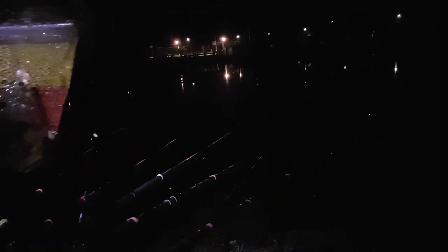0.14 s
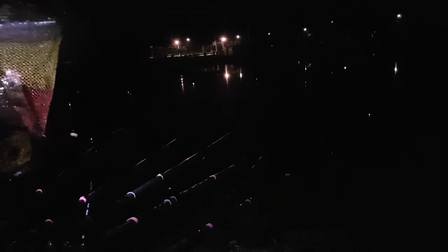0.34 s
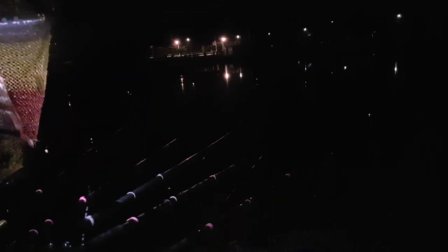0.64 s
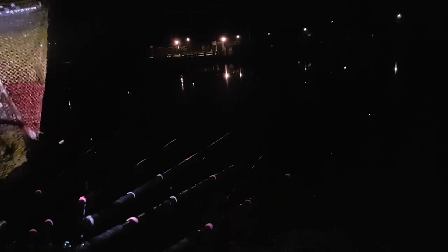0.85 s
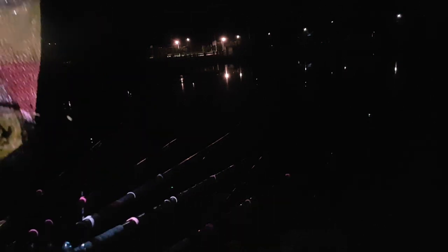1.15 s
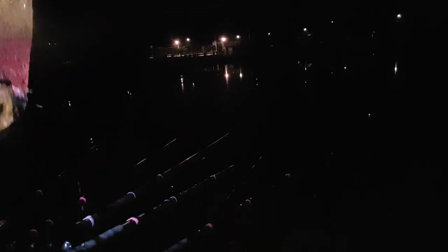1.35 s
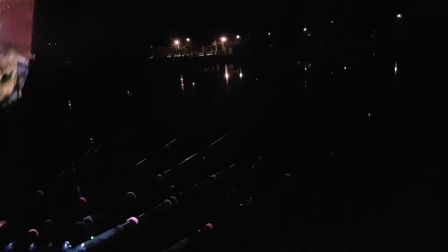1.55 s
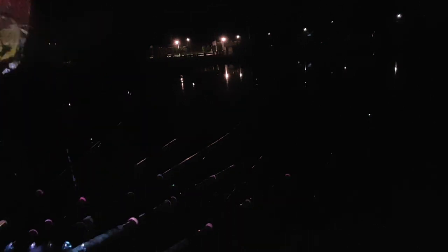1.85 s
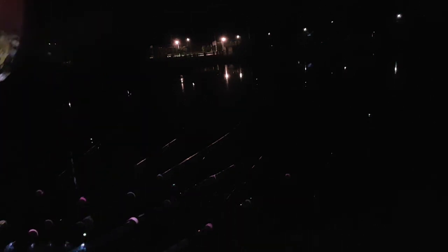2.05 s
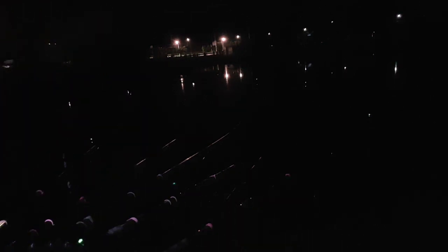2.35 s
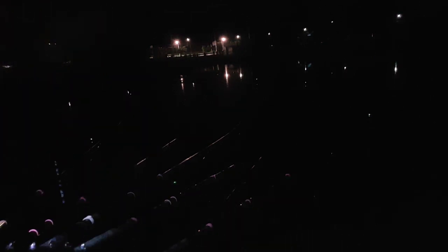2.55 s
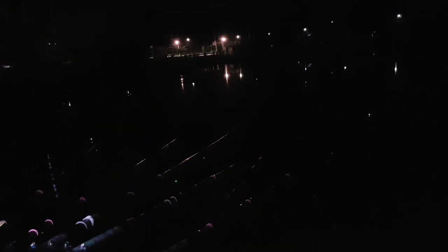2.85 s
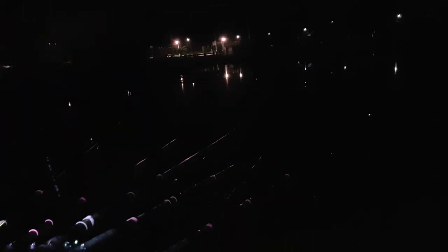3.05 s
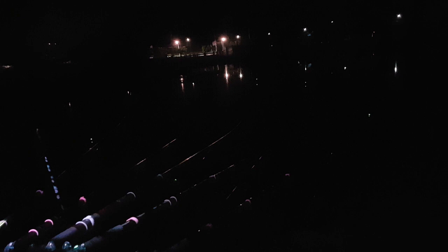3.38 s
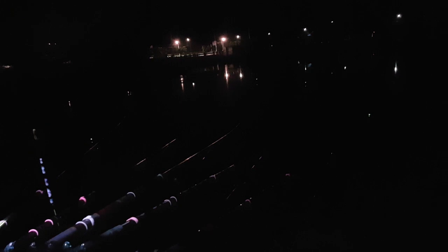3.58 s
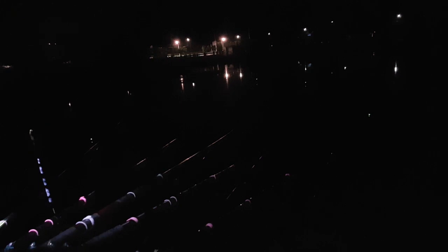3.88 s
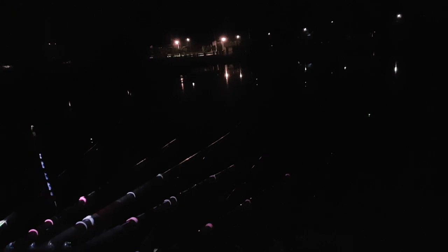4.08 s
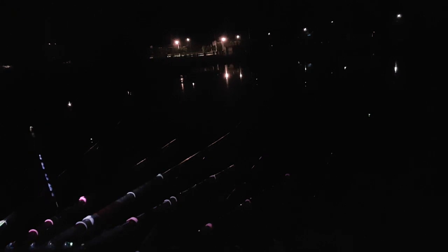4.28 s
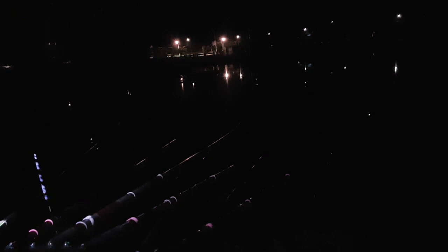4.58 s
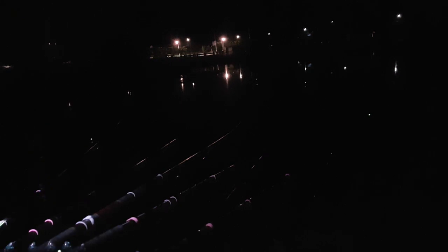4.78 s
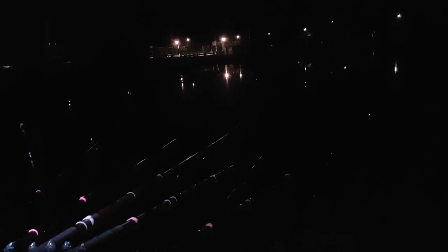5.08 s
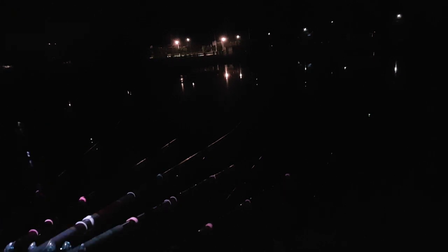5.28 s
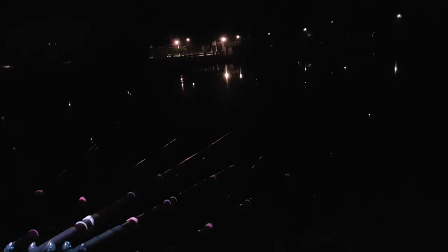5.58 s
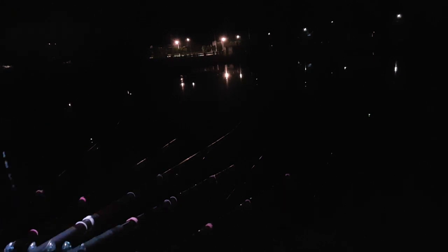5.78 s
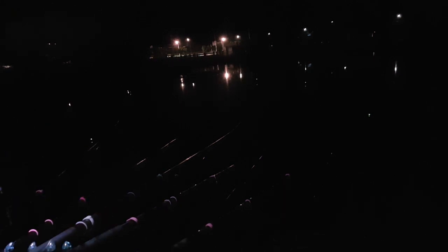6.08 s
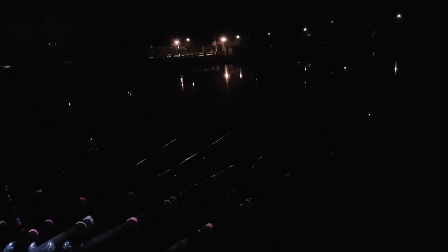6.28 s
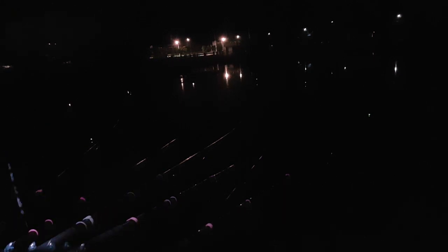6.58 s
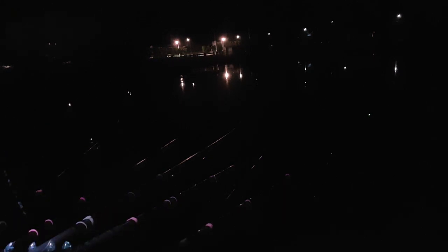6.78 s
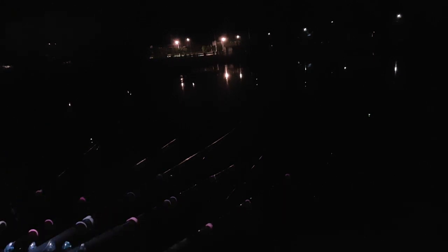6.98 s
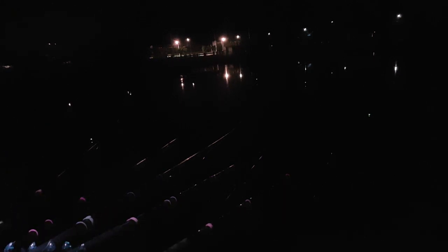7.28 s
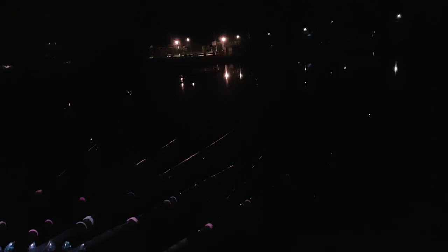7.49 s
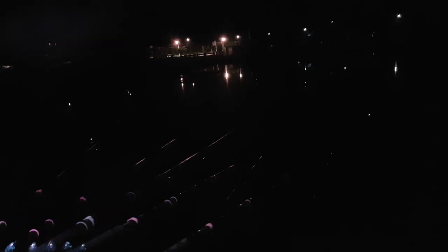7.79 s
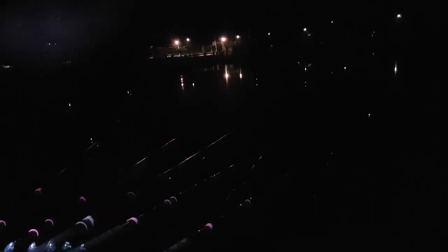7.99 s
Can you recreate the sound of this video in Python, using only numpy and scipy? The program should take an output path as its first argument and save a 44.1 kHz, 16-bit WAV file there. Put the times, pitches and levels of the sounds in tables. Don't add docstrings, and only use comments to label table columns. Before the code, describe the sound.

Regular low, buzzing bullfrog croaks by a dark waterside, a fainter second frog overlapping early ones, with small gurgles, gear clicks and soft rustle.

```python
import sys
import numpy as np
from scipy import signal
from scipy.fft import rfft, irfft
from scipy.io import wavfile
from scipy.ndimage import uniform_filter1d

SR = 44100
rng = np.random.default_rng(int(sys.argv[2]) if len(sys.argv) > 2 else 0)


def waveform_to_disk(signal):
    frames = np.transpose(np.atleast_2d(signal))
    scaled = np.clip(frames, -1, 1) * 32767
    samples = np.round(scaled).astype(np.int16)
    wavfile.write(sys.argv[1], SR, samples)


def volts_from_decibels(level):
    exponent = np.asarray(level, float) / 20
    return 10 ** exponent


N = 358765
TIME = np.arange(N) / SR
HZ = np.maximum(np.arange(N // 2 + 1) * SR / N, 1)

# start_s, length_s, top_pulse_hz, level_db
CROAKS = [
    (-.3, .73, 94.8, -41),
    (.84, 0.77, 97.1, -39),
    (2.13, 0.72, 99.8, -38),
    (3.34, .85, 100.3, -38.5),
    (4.56, .77, 100.4, -39.5),
    (5.87, .74, 99.93, -39.5),
    (7.19, .74, 99.56, -39.5),
]
# attack_s, after_attack, top_share_of_length, before_release, release_s, linger_s, at_rest
# sac, overtones and throat levels in db, pitch in percent
SAC_CONTOUR = (0.1, -7.5, 0.64, -0.5, 0.14, 0.04, -27)
OVERTONE_CONTOUR = (0.12, -8.5, 0.57, -2, 0.13, 0, -19)
THROAT_CONTOUR = (.12, -6, .5, -3.5, 0.1451, 0, -26)
PITCH_CONTOUR = (0.1157, -4, 0.5, -0.75, 0.2, -0.02, -9)
SAC_DB, OVERTONE_DB = -1, -9.5
# multiple, level_db
OVERTONES = [(3, -1), (4, 0), (5, 0.5), (6, -0.5), (7, -3), (8, -3)]
# freq_hz, gain_db
THROAT = [(510, -53), (860, -15.5), (938, -10), (1050, -2), (1092, 4.5), (1170, -8.5), (1310, -2.5),
          (1470, -17), (1580, -2.5), (1660, -3.5), (1860, -10), (1990, -21.5), (2180, -15.5), (2620, -25.5),
          (2900, -22.5), (3770, -57), (6380, -120)]
FULL_PULSE_HZ, STRETCH_POWER = 99.5, .8
LIMP_CYCLES, JITTER_S, PUFF_DB = .017, .00006, -11
CATCH_S, CATCH_WIDTH_S, CATCH_DEPTH = 0.238, 0.02, 0.43

# start_s, length_s, hum_db, cancels_at_s, beats_hz
BEATS = [
    (-.3, .55, -46, .35, -1.1),
    (0.865, 0.75, -36.5, 1.44, -2.5),
    (2.15, 0.79, -40.5, 2.51, -3),
    (3.681, 0.63, -41, 3.94, -4),
]
BEAT_LATE_S = [0.0025, 0.0031, 0.026, .1]
# start_s, length_s, pulse_hz, level_db
NEIGHBOUR = [
    (-.3, 0.72, 94.8, -50.5),
    (0.802, 0.82, 97.2, -48.5),
    (2.203, 0.704, 98.8, -48.5),
    (3.62, 0.68, 99.6, -47),
]
# multiple, level_db, left_lead_rad
NEIGHBOUR_LINES = [(3, 0, 1.67), (4, -3.5, 0.37), (6, -7, 0.91)]
# start_s, length_s, pulse_hz, centre_hz, width_hz, level_db
BUZZ = (0.86, 0.27, 93.5, 1200, 378, -51.5)

# start_s, start_hz, length_s, level_db, left_minus_right_db
RISING = [
    (4.3, 920, 0.075, -55.5, 8),
    (4.512, 929, .1, -55, 9),
    (4.6, 1230, .045, -60, 6.4),
    (8.078, 987, .052, -51, 5),
]
# start_s, start_hz, length_s, level_db,
# left_minus_right_db
GURGLES = [(2.12, 586, 0.063, -50.5, 2), (2.192, 510, .037, -54, 1), (2.31, 560, 0.15, -52, 2),
           (2.532, 594, 0.07, -47.5, 0), (2.713, 588, .08, -51, 5), (3.184, 938, 0.19, -62.5, 6),
           (4.362, 670, 0.043, -57, 9), (4.412, 656, 0.032, -58, 0), (4.545, 982, 0.05, -58.5, 4),
           (4.3, 978, .04, -59, 6), (4.315, 1700, 0.06, -63, 6), (4.325, 2090, .065, -67, 4),
           (4.33, 2670, .045, -68, 6), (4.47, 1356, 0.049, -63, 6), (4.54, 1710, 0.06, -64, 6),
           (.02, 3340, 0.019, -56, 8), (.098, 3250, 0.019, -60, 8), (6.74, 938, 0.065, -68, 0),
           (6.85, 1100, .04, -67, 6), (6.975, 1010, .035, -62, 0), (4.604, 702, 0.013, -50.5, 2),
           (6.58, 1485, 0.038, -61.5, 2), (6.662, 1230, 0.067, -64, -6), (6.884, 678, .046, -63, 0),
           (6.89, 1125, .033, -60.5, 10), (6.975, 596, .023, -58, 0), (8.06, 977, 0.038, -50.5, 15),
           (8.116, 930, .03, -53, 9)]
RISE_RATIO, DRIFT_RATIO = 1.37, 1.02
# time_s, peak_db, swing_hz
THUMPS = [
    (6.581, -40, 453),
    (7.837, -38, 448),
    (7.928, -32.5, 447),
    (8.077, -39, 450),
]

# ticks up to 2.7 s, ticks from 3.2 s on, #
# and further faint ticks near 1.6 s and 6.5 s; time_s, dull_db, middle_db, bright_db, airy_db
EARLY_TICKS = [(0.018, -46, -49, -48, -49), (0.1242, -57, -64, -52, -55), (0.174, -66, -64, -56, -45),
               (0.182, -60, -64, -57, -43), (0.2297, -45, -44, -43, -41), (0.242, -52, -60, -57, -61),
               (0.3132, -71, -61, -52, -50), (0.3615, -56, -62, -55, -56), (0.376, -52, -57, -61, -73),
               (0.4, -62, -62, -58, -64), (0.4707, -73, -62, -53.5, -48), (0.549, -53, -59, -55, -62),
               (0.56, -57, -64, -74, -71), (0.596, -46, -52, -56, -74), (0.6885, -48, -60, -60, -73),
               (0.7477, -74, -65, -55, -56), (0.7785, -73, -66, -58, -56), (0.9294, -47, -42, -41, -37),
               (0.9469, -55, -56, -56, -58), (1.1499, -35.5, -45, -62, -69), (1.4172, -52, -65, -74, -72),
               (1.5701, -61, -61, -64, -53), (1.713, -56, -56, -56, -58), (2.3022, -61, -58, -53, -44),
               (2.317, -69, -64, -61, -52), (2.4094, -66, -58, -54, -49), (2.7082, -41.5, -45, -47, -58),
               (2.717, -44, -48, -53, -59)]
LATE_TICKS = [(3.1885, -49, -47, -57, -65), (3.2061, -48, -51, -56, -56), (3.217, -50, -50, -54, -62),
              (3.23, -52, -56, -56, -60), (3.248, -55, -52, -57, -59), (3.2799, -56, -63, -56, -49),
              (3.297, -56, -59, -58, -58), (3.9519, -53, -57, -65, -71), (4.1375, -52, -65, -74, -71),
              (4.1759, -50, -58, -69, -73), (4.2862, -63, -61, -58, -61), (4.7865, -55, -62, -64, -74),
              (5.5243, -70, -57, -61, -64), (6.103, -61, -58, -58, -69), (6.1938, -55, -47, -61, -68),
              (6.2332, -56, -57, -53, -52), (6.2841, -48, -57, -67, -70), (6.9785, -66, -51, -47, -60),
              (7.1721, -73, -64, -64, -64), (7.2549, -54, -63, -70, -71), (7.2818, -59, -65, -61, -62),
              (7.305, -69, -75, -65, -71), (7.3736, -65, -58, -59, -58), (7.4325, -61, -68, -59, -54),
              (7.7, -54, -63, -61, -56), (7.7149, -51, -47, -43, -43), (7.7345, -48, -47, -41, -38),
              (7.738, -50, -44, -42.5, -38), (7.753, -61, -48, -58, -61)]
FAINT_TICKS = [(1.495, -72, -72, -64, -61), (1.65, -70, -61, -72, -72), (1.667, -70, -64, -62, -64),
               (1.724, -56, -56, -54, -58), (6.478, -66, -64, -58, -58)]
EARLY_PAN_DB, LATE_PAN_DB, FAINT_PAN_DB = 8.6, 10.8, 5.5
# low_hz, high_hz, mode_1_hz, mode_2_hz, t60_s
GEAR = [(2100, 3600, 2750, 3300, 0.036), (3840, 6000, 4300, 4700, 0.026), (5930, 10300, 7700, 9700, 0.019),
        (11000, 16000, 12200, 16000, 0.016)]
# start_s, length_s, low_hz, high_hz, level_db
SCRAPES = [
    (.8, .04, 2500, 4000, -62),
    (.853, .055, 2700, 4200, -57),
    (2.715, .045, 1800, 6500, -51),
    (3.19, .07, 3500, 6000, -60),
    (4.31, .11, 1250, 2800, -60),
    (4.53, .09, 1300, 2800, -62),
    (6.13, .13, 2500, 15000, -61),
    (7.47, .05, 3000, 15000, -58),
    (8.085, .05, 1800, 3200, -59),
]
SLIPS_HZ = 105
# time_s, level_db
KNOCKS = [
    (.376, -54),
    (.597, -48.5),
    (.688, -63),
    (1.15, -42),
]
# freq_hz, level_db, t60_s
ROD = [(1900, 3, 0.11), (2110, 0, 0.055), (2726, 2, 0.05), (4230, -1, 0.033)]

# time_s, over_rest_db
RUSTLE = [(0, 6.5), (.25, 2.5), (.63, -1), (1.25, 5.5), (2.0, -.5), (2.5, 5), (2.7, 12), (2.82, 2.5),
          (3.56, 0), (4.03, 5.5), (4.4, -2.5), (5.03, 1), (5.8, -3), (6.22, 6.5), (6.68, 0), (7.23, 0.5),
          (7.7, 10), (8.14, 6)]
# low_hz, high_hz, rest_db, follows_motion_ratio
CLOTH = [(1890, 3960, -68.5, 1.08), (4220, 7900, -74, 1.04), (10670, 29000, -67, 1.03)]
HISS_TOP_HZ = 15775

# freq_hz, density_db
NIGHT = [(12, -55), (20, -16), (27, -20), (49, -12), (76, -6.5), (103, -8), (180, -9.5), (250, -11),
         (310, -18.5), (594, -18), (793, -19), (1180, -23), (4000, -33), (5200, -71), (8800, -120)]
NIGHT_DB = -51.5
# freq_hz, width_hz, level_db
HUM = [(93.4, 9.3, -56), (118.26, 3.1, -59.5), (170.1, 3.2, -58)]
# freq_hz, correlation
LIKENESS = [(60, 0.85), (130, 0.99), (290, 0.4), (640, 0.35), (1400, 0.045), (3000, 0.025)]


def bullfrog():
    start_s, length_s, top_hz, croak_db = np.transpose(CROAKS)
    calling = sum(1. * (TIME >= s) * (TIME <= s + d + .04) for s, d in zip(start_s, length_s))
    calling = uniform_filter1d(calling, size=900)
    sac = volts_from_decibels(croak_contour(SAC_CONTOUR, croak_db + SAC_DB)) * calling
    overtones = volts_from_decibels(croak_contour(OVERTONE_CONTOUR, croak_db + OVERTONE_DB)) * calling
    throat = volts_from_decibels(croak_contour(THROAT_CONTOUR, croak_db)) * calling

    top_percent = 100 * (top_hz / FULL_PULSE_HZ - 1)
    pulse_hz = FULL_PULSE_HZ * (1 + croak_contour(PITCH_CONTOUR, top_percent) / 100)
    cycles = np.cumsum(pulse_hz * (1 + 0.00314 * walk(30))) / SR
    limp = LIMP_CYCLES * (1 + .25 * walk(6)) * np.sin(2 * np.pi * cycles / 3 + 1.16 * walk(7))
    puff = rng.standard_normal((3, N)) * np.exp(-(cycles % 1) / .9)

    hum = sac_hum(sac, cycles, pulse_hz)
    nasal = nasal_throat(throat, cycles + limp, puff[0])
    upper = partials(cycles + limp, OVERTONES, rough=.3, apart=.15, rate=40, spread=1.3)
    upper = upper + level(band(puff[0] + .5 * puff[1:], 230, 900), -8)
    upper = overtones * upper
    echo = volts_from_decibels(-12) * banks(upper.mean(axis=0), t60=.2, wet_db=20)
    bright = banks(throat * nasal, t60=.09, wet_db=-3.5)
    return pan(np.sqrt(2) * hum, 0.52, lag=3.5) + pan(upper, 1.7, lag=4) + pan(bright, 1.5, lag=5.7) + echo


def sac_hum(sac, cycles, pulse_hz):
    hum = sac * np.sin(4 * np.pi * cycles) * volts_from_decibels(1.25 * walk(30))
    for (start_s, length_s, hum_db, cancels_s, beats_hz), late_s in zip(BEATS, BEAT_LATE_S):
        late_hz = np.interp(TIME - late_s, TIME, pulse_hz)
        drift = np.cumsum(2 * (late_hz - pulse_hz) + beats_hz) / SR
        drift = drift - drift[int(cancels_s * SR)]
        arch = np.sin(np.pi * np.clip((TIME - start_s) / length_s, 0, 1)) ** 0.65
        hum = hum - volts_from_decibels(hum_db) * arch * np.sin(4 * np.pi * cycles + 2 * np.pi * drift)
    return hum


def nasal_throat(throat, fold_cycles, puff):
    stretch = 1 + (croak_contour(PITCH_CONTOUR, np.zeros(len(CROAKS))) + .8) / 100
    clock = np.cumsum(stretch ** STRETCH_POWER)
    closures = clock[np.flatnonzero(np.diff(np.floor(fold_cycles)))]
    chance = rng.standard_normal((N // 200, 2))[:len(closures)]
    at = np.clip(closures + JITTER_S * SR * chance[:, 0], 0, N - 1).astype(int)
    pulses = np.zeros(N)
    pulses[at] = volts_from_decibels(.7 * chance[:, 1])
    nasal = level(causal(level(pulses, 0) + level(puff, PUFF_DB), THROAT), 0)
    nasal = np.interp(clock, np.arange(N), nasal)
    effort = np.minimum(throat / volts_from_decibels(-43), 1) ** .3
    nasal = nasal - (1 - effort) * band(nasal, 1130, 2800)
    catch = CATCH_DEPTH * sum(np.exp(-((TIME - row[0] - CATCH_S) / CATCH_WIDTH_S) ** 2) for row in CROAKS)
    return nasal - catch * band(nasal, 1460, 2100)


def croak_contour(rule, tops):
    attack_s, entry, share, sag, release_s, linger_s, rest = rule
    start_s, length_s = np.transpose(CROAKS)[:2, :, None]
    offset_s = np.array([0, attack_s, 0, -release_s, linger_s])
    points_s = start_s + offset_s + length_s * np.array([0, 0, share, 1, 1])
    values = tops[:, None] + [rest, entry, 0, sag, rest]
    return np.interp(TIME, points_s.ravel(), values.ravel())


def partials(cycles, table, rough, apart, rate, spread):
    out = 0
    for k, db in table:
        both, left, right = (walk(rate) + 1j * walk(rate) for _ in range(3))
        waver = 1 + rough * both + apart * np.array([left, right])
        out = out + volts_from_decibels(db) * (waver * np.exp(2j * np.pi * k * cycles + 1j * spread * k * k)).real
    return level(out, 0)


def neighbour():
    start_s, length_s, pulse_hz, centre_hz, width_hz, db = BUZZ
    closures = np.diff(np.floor(TIME * pulse_hz), prepend=0)
    rung = band(closures, centre_hz - width_hz / 2, centre_hz + width_hz / 2)
    rung = rung + .5 * band(closures, 1630, 1870)
    out = pan(level(rung, db) * np.sin(np.pi * np.clip((TIME - start_s) / length_s, 0, 1)), 2)
    for start_s, length_s, pulse_hz, db in NEIGHBOUR:
        on = (TIME > start_s) & (TIME < start_s + length_s)
        arch = np.sin(np.pi * (TIME[on] - start_s) / length_s)
        cycles = np.cumsum(pulse_hz * (.93 + .07 * arch ** 0.622)) / SR
        for k, line_db, lead_rad in NEIGHBOUR_LINES:
            phase = 2 * np.pi * k * cycles + np.array([[lead_rad], [-lead_rad]]) / 2
            out[:, on] += volts_from_decibels(db + line_db + 3 * walk(18)[on]) * arch ** 0.85 * np.sin(phase)
    return out


def gurgles():
    out = np.zeros((2, N))
    lapping = [(a * 8, 300 + 900 * b, .02 + .03 * c, -71 + 6 * d, 8 * (c - .5), 1.1)
               for a, b, c, d in rng.random((70, 4))]
    pockets = [(*row, RISE_RATIO) for row in RISING] + [(*row, DRIFT_RATIO) for row in GURGLES] + lapping
    for start_s, hz, length_s, db, pan_db, glide in pockets:
        i = int(start_s * SR)
        u = np.arange(int(length_s * SR)) / (length_s * SR)
        bend = 1 + (glide - 1) * u ** .8 + 0.024 * np.sin(60 * length_s * u + 9 * start_s)
        phase = 2 * np.pi * np.cumsum(hz * bend) / SR
        wobble = 1 + .5 * np.sin(2 * np.pi * (85 * length_s * u + start_s))
        ring = np.sin(phase) + .7 * (glide - 1) * u * np.sin(2.1 * phase)
        blip = pan(volts_from_decibels(db + 3) * wobble * np.sin(np.pi * u) ** .6 * ring, pan_db)
        out[:, i:i + len(u)] += blip[:, :N - i]
    out = out + volts_from_decibels(-3) * banks(out.mean(axis=0), t60=.18, wet_db=10)
    for time_s, db, hz in THUMPS:
        u = (TIME - time_s) * hz - .8
        out += volts_from_decibels(db) * np.exp(-(u / 0.56) ** 2) * np.cos(2 * np.pi * u)
    return out


def ticks():
    size = 2048
    out, u = np.zeros((2, N + size)), TIME[:size]
    groups = (EARLY_PAN_DB, EARLY_TICKS), (LATE_PAN_DB, LATE_TICKS), (FAINT_PAN_DB, FAINT_TICKS)
    rows = np.array([(*row, pan_db) for pan_db, group in groups for row in group])
    sound = 0
    for k, (lo_hz, hi_hz, *modes_hz, t60) in enumerate(GEAR):
        noise = rng.standard_normal((len(rows), 3, size))
        odd = rng.standard_normal((len(rows), 2, 4, 1))
        fade = (volts_from_decibels(-100 * u / t60) + 0.06 * volts_from_decibels(-60 * u / 0.1)) * np.minimum(u / 0.00076, 1)
        crack = (noise[:, :1] + 1.1 * noise[:, 1:]) * fade
        part = band(crack, lo_hz, hi_hz) * np.sqrt(SR / 2 / (hi_hz - lo_hz))
        for j, hz in enumerate(modes_hz):
            phase = 2 * np.pi * hz * (1 + .04 * odd[:, :1, j]) * u + odd[:, :, j]
            decay = volts_from_decibels(5.4 * odd[:, :1, j + 2] - 60 * u / t60)
            part = part + 0.63 * decay * np.sin(phase) * np.minimum(u / 0.0004, 1)
        onset = np.sqrt(np.mean(part[..., :170] ** 2, axis=(1, 2)))
        sound = sound + part * (volts_from_decibels(rows[:, k + 1] - 2.0) / onset)[:, None, None]
    for row, tick in zip(rows, sound):
        i = int(row[0] * SR)
        out[:, i:i + size] += pan(tick, row[5], lag=4)
    return out[:, :N]


def scrapes():
    size = 8192
    out, t = np.zeros((2, N + size)), TIME[:size]
    for start_s, length_s, lo_hz, hi_hz, db in SCRAPES:
        steps = np.cumsum(np.repeat(rng.uniform(.5, 1.6, 32), 256)) * SLIPS_HZ / SR
        slips = .3 + .6 * np.exp(-(steps % 1) / .3)
        slips = slips * np.sin(np.pi * np.minimum(t / length_s, 1)) ** .5
        scrape = band(rng.standard_normal((2, size)) * slips, lo_hz, hi_hz) * np.sqrt(SR / (hi_hz - lo_hz))
        i = int(start_s * SR)
        out[:, i:i + size] += volts_from_decibels(db + 4) * pan(scrape, 6)
    return out[:, :N]


def rod():
    out, t = np.zeros(N), TIME[:8192]
    for time_s, db in KNOCKS:
        ring = sum(volts_from_decibels(db + g - 60 * t / t60) * np.sin(2 * np.pi * hz * t) for hz, g, t60 in ROD)
        out[int(time_s * SR):][:8192] += ring
    return pan(out, 7.1, lag=5.2)


def rustle():
    motion_db = np.interp(TIME, *np.transpose(RUSTLE))
    flicker_db, out = 1.07 * walk(25) + 1.2 * walk(90), 0
    for lo_hz, hi_hz, rest_db, follows in CLOTH:
        hiss = level(band(rng.standard_normal((2, N)), lo_hz, hi_hz), 2.6)
        gain_db = rest_db + follows * motion_db + flicker_db + 0.5 * walk(6.8)
        out = out + volts_from_decibels(gain_db) * pan(hiss, 2.5)
    return irfft(rfft(out) * (HZ < HISS_TOP_HZ), N)


def night():
    lines = sum(volts_from_decibels(db) / np.sqrt(w) / np.hypot(1, ((HZ - f) / w * 2) ** 2) for f, w, db in HUM)
    broad = volts_from_decibels(over_hz(NIGHT)) / np.hypot(1, (HZ / 2600) ** 4)
    broad = broad * volts_from_decibels(NIGHT_DB + 0.5) / np.sqrt(np.sum(broad ** 2) * SR / N)
    colour = np.hypot(broad, lines)
    alike = np.clip(over_hz(LIKENESS), 0, 1)
    mid, side = (irfft(rfft(rng.standard_normal(N)) * colour * np.sqrt(SR / 4 * (1 + c)), N)
                 for c in (alike, -alike))
    return np.array([mid + side, mid - side]) * volts_from_decibels(0.81 * walk(4.07))


def banks(x, t60, wet_db):
    t = np.arange(int(.25 * SR)) / SR
    tail = rng.standard_normal((2, len(t))) * volts_from_decibels(-60 * t / t60) * (t > .004)
    tail = tail / np.sqrt(np.sum(tail ** 2, axis=1, keepdims=True))
    wet = signal.fftconvolve(x[None], tail, axes=1)[:, :N]
    return (x + volts_from_decibels(wet_db) * wet) / np.sqrt(1 + volts_from_decibels(2 * wet_db))


def pan(x, db, lag=0):
    x = np.broadcast_to(x, (2, x.shape[-1]))
    return np.array([np.roll(x[0], lag) * volts_from_decibels(db / 2), x[1] * volts_from_decibels(-db / 2)])


def causal(x, table):
    hz, db = np.transpose(table)
    gain_db = np.interp(np.log(np.arange(1, 4098) * SR / 8192), np.log(hz), np.maximum(db, -60))
    cepstrum = irfft(np.log(volts_from_decibels(gain_db)))
    cepstrum[1:4096] *= 2
    cepstrum[4097:] = 0
    response = irfft(np.exp(rfft(cepstrum)))[:4096]
    return signal.fftconvolve(x, response)[:N]


def walk(rate):
    k = int(SR / rate / 20)
    steps = np.repeat(rng.standard_normal(N // k // 20 + 2), k)
    steps = uniform_filter1d(uniform_filter1d(steps, k), k)
    return 1.276 * np.interp(TIME, np.arange(len(steps)) * 20 / SR, steps)


def band(x, lo_hz, hi_hz):
    return signal.sosfilt(signal.butter(2, [lo_hz, min(hi_hz, .45 * SR)], "band", fs=SR, output="sos"), x)


def level(x, db):
    return x * volts_from_decibels(db) / np.sqrt(np.mean(x ** 2))


def over_hz(table):
    hz, value = np.transpose(table)
    return np.interp(np.log(HZ), np.log(hz), value)


def scene():
    return bullfrog() + neighbour() + gurgles() + ticks() + scrapes() + rod() + rustle() + night()


def band_limit(x):
    return signal.sosfilt(signal.butter(12, 16650, fs=SR, output="sos"), x)


def record(dry):
    top_cut = signal.ellip(10, .3, 70, 16150, fs=SR, output="sos")
    mix = signal.sosfilt(top_cut, dry) - .0019
    return band_limit(mix)


dry = scene()
out = record(dry)
waveform_to_disk(out)
```